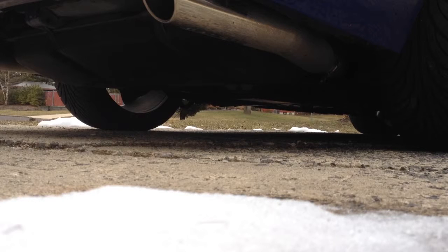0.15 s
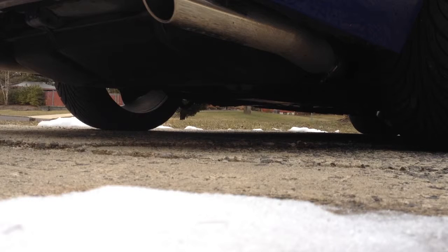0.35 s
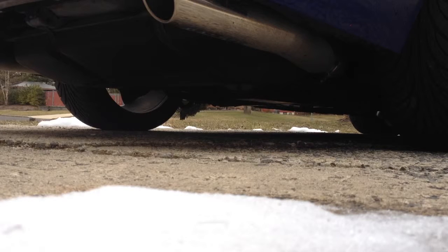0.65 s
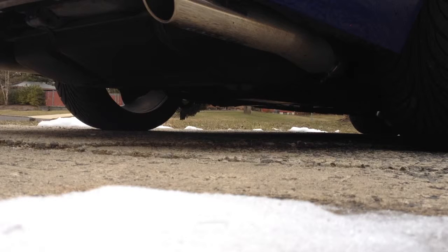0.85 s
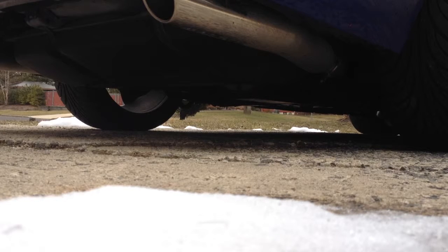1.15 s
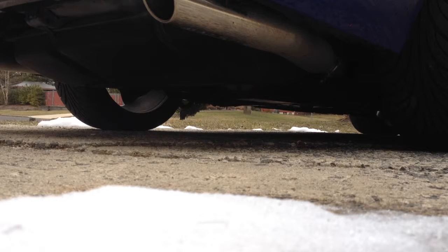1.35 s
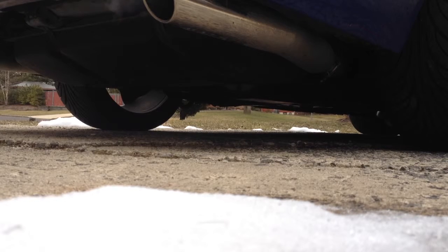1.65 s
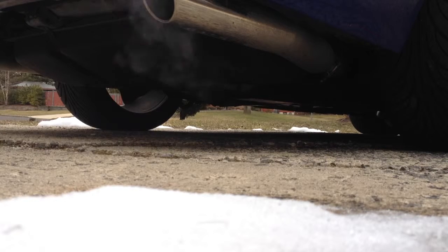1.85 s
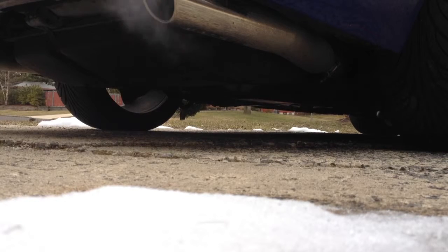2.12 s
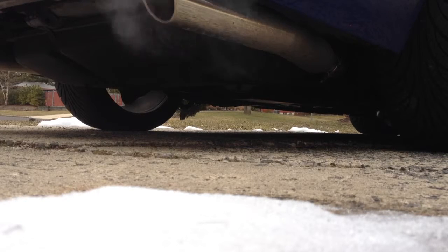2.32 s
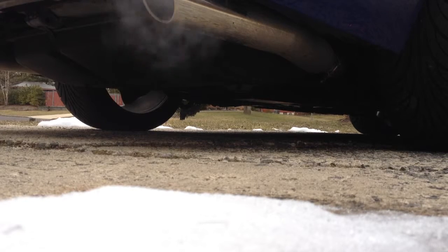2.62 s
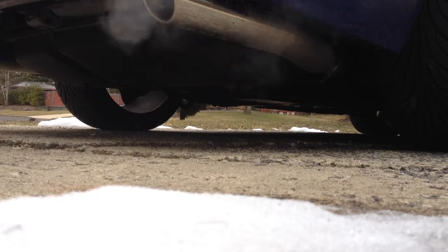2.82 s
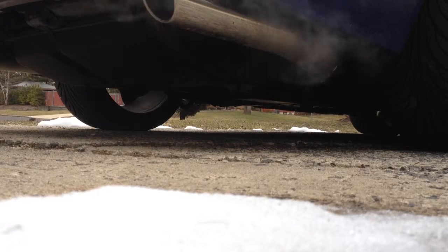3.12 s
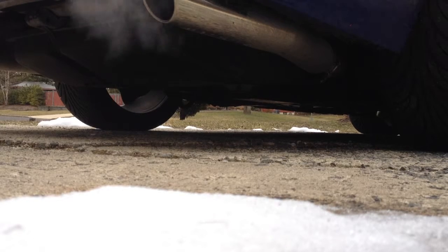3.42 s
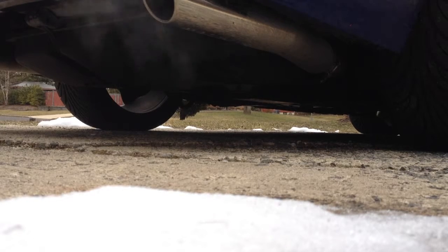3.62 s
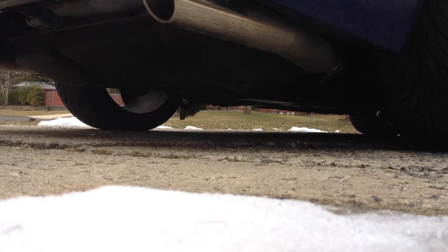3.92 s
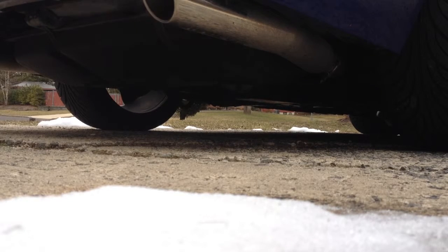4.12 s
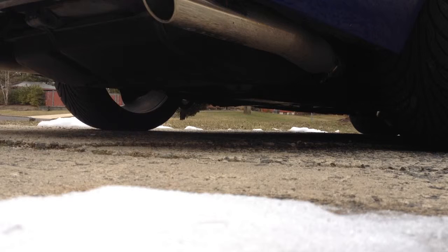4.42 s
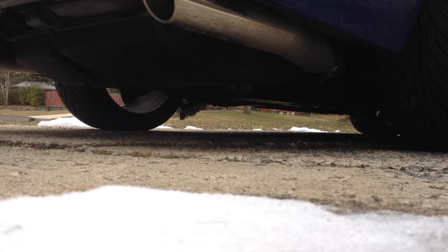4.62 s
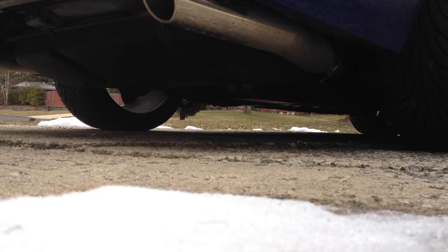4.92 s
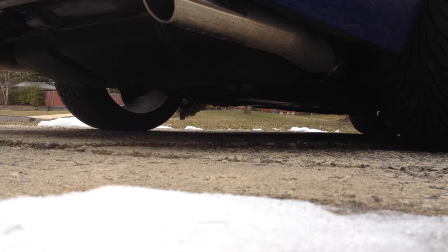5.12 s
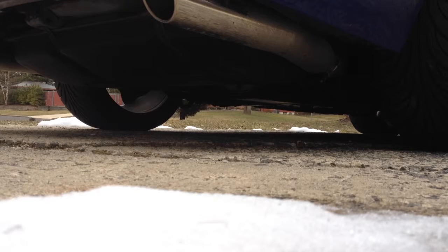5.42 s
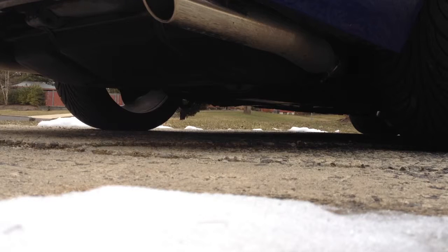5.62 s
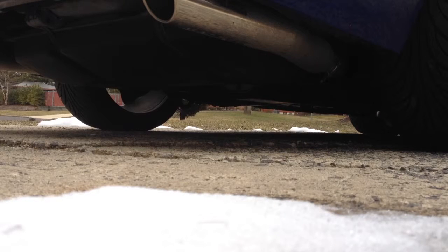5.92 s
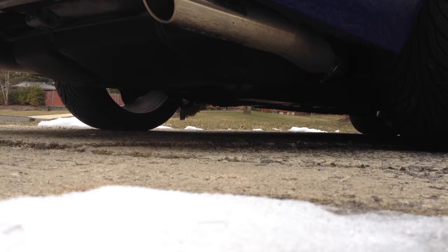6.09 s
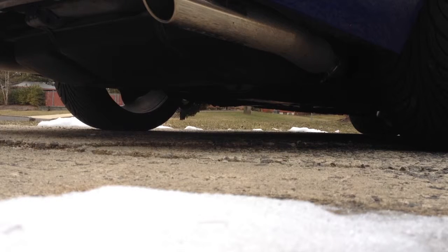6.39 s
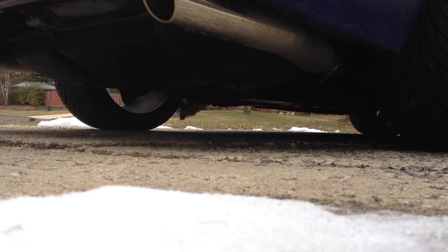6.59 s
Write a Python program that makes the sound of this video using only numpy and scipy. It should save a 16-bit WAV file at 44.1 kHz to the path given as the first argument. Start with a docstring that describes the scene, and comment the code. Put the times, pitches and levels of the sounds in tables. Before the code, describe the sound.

A V8 car engine idles with a deep loping exhaust, then shuts off, chuffing to a stop with brief belt chirps.

```python
"""A driveway, the microphone on the ground close beside the tailpipe of an idling V8. Eight unequal
cylinders ring the exhaust in a loping pattern over gas hiss and clatter. Near 4 s the load comes off and
the idle lifts. Just before 5 s the ignition is cut: the engine chuffs to a stop, valves ticking, and the
slipping belt chirps. Last, the fan coasts down and the car's panels knock over the quiet of the yard."""
import sys
import numpy as np
from scipy import signal
from scipy.fft import rfft, irfft, next_fast_len
from scipy.io import wavfile
from scipy.ndimage import uniform_filter1d

SR = 44100
rng = np.random.default_rng(int(sys.argv[2]) if len(sys.argv) > 2 else 0)


def dump_mix(stems):
    """Bounce the given channels to the path in sys.argv[1] as a 16-bit WAV at rate SR."""
    frames = np.atleast_2d(stems).T  # one column per channel
    limited = np.clip(frames, -1, 1)  # hard clip at full scale
    pcm = np.round(limited * 32767).astype(np.int16)
    wavfile.write(sys.argv[1], SR, pcm)


N = 297665
T = np.arange(N) / SR
BINS = np.maximum(np.fft.rfftfreq(next_fast_len(2 * N, True), 1 / SR), 1)  # Hz
FFT_SIZE = 2 * (len(BINS) - 1)

CYLINDERS = 8
LIFT_AT_S, LIFT_TAKES_S, UNLOAD_S = 3.902, 0.15, 4.07  # the idle lifts, then the lope changes
CUT_S, SURGE_ATTACK_S, STOP_S = 4.89, 0.024, 5.7  # ignition off, unburnt air surges, the crank rests

# Exhaust resonances, two rows to a register: boom, drone, growl, bark, rasp.
# Each row: pitch in Hz, width in Hz, level in dB.
PIPE_MODES = [(126.45, 17.3, 4.5), (140, 18.6, -4.5), (214.3, 43, 0.3), (230.4, 24, 5), (261.8, 15.5, -5.5),
              (335.5, 76, -8), (345.1, 26, -0.7), (396, 96, -9.5), (438, 18.6, -7.5), (447.4, 21.2, -2.5)]


def exhaust(times, cylinder, trim_db=-0.22, path_width_octaves=0.46):
    """Each cylinder's puff has its own delay, strength and pitch, so the note lopes every eight firings."""
    # The cylinders in firing order, under load and running free.
    # Each row: lag in ms, strength in dB, pitch in Hz that its path to the tailpipe favours.
    loaded = [(-1.06, 4.5, 397), (5, 2.5, 169), (-0.65, 4, 372), (-1.5, -3, 203), (7, 8, 113),
              (4.5, 0.24, 295), (4.5, 4, 138), (5.5, 0.2, 127)]
    free = [(-6.5, 9, 590), (-4.5, 2.5, 400), (1.4, 4.5, 500), (-7, 1.3, 193), (2.5, 0, 276),
            (-2.5, 8.39, 140), (-1.5, 7.54, 118.0), (-1.71, 5, 156)]
    under_load = (times < UNLOAD_S)[:, None]
    lag_ms, db, hz = np.where(under_load, np.array(loaded)[cylinder], np.array(free)[cylinder]).T
    # a warm idle repeats closely
    stray_ms, stray_db = (rng.standard_normal((len(times), 2)) * [0.09, 0.9]).T
    arrivals = times + (lag_ms + stray_ms) / 1000
    octaves_off = np.log2(np.array(PIPE_MODES)[::2, 0] / hz[:, None])
    path_db = -20 * np.log10(1 + (octaves_off / path_width_octaves) ** 2)
    return pipe(arrivals, (db + trim_db + stray_db)[:, None] + path_db)


def pipe(times, register_db):
    """Millisecond puffs of pressure ring the exhaust; neighbouring modes swing in opposite senses."""
    out = 0
    for register, db in enumerate(register_db.T):
        pair = PIPE_MODES[2 * register:2 * register + 2]
        lower, upper = (undb(mode_db) * resonance(hz, width) for hz, width, mode_db in pair)
        out += filtered(pulses(times, undb(db) * SR / 1000), lower - upper)
    return out


def overtones(times, cylinder, rise_s=0.011):
    """The thin tailpipe sings hoarsely as certain cylinders' puffs blow through it."""
    # Each row: place in the firing order, pitch in Hz, width in Hz, level in dB.
    hoarse_notes = [(0, 410, 125, -27.5), (0, 558, 80, -45), (0, 722, 110, -43), (4, 807, 90, -43),
                    (6, 882, 80, -46), (6, 978, 90, -38.5), (6, 1530, 200, -44)]
    age = T[:SR // 10] / rise_s
    puff = age * np.exp(1 - age)
    out = 0
    for slot, hz, width, db in hoarse_notes:
        puffs = repeated(puff, times, cylinder == slot)
        out += undb(db) * puffs * noise(resonance(hz, width))
    return out


def throb(crank, firing_db=-47, burble_db=-42):
    """The firing rate itself hums deep down, under a soft irregular burble."""
    # Each row: frequency in Hz, level in dB.
    burble_spectrum = [(25, -8.5), (50, -13.5), (85, -8.5), (130, -4), (260, -4.5), (480, 7), (600, 2.5)]
    running = np.interp(T, [5.0, 5.2], [1, 0])
    hum = undb(firing_db) * np.sin(2 * np.pi * crank)
    return running * (hum + undb(burble_db) * noise(colour(burble_spectrum)))


def gas(crank, times, cylinder, clatter_db=-4, spit_db=3, spit_decay_firings=0.24, unlit_share=0.6):
    """Gas rushes out under the engine's clatter; its hiss spits once a puff, less sharply after the cut."""
    # The low rush and the high hiss. Each row: frequency in Hz, level in dB.
    rush_spectrum = [(380, -27), (650, -9), (711, 3.5), (764, -0.5), (921, -5.5), (974, -2), (1100, -4.5),
                     (1200, -10), (1510, -4.5), (1820, -11.5), (2170, -11.5), (2790, -14.5), (3390, -24.5),
                     (4500, -27.5), (5850, -60.5), (9900, -120)]
    hiss_spectrum = [(2060, -30.5), (3500, -8), (3830, -14.5), (4200, -0.5), (4630, -7.5), (5110, 3),
                     (6020, -0.5), (6880, -7.5), (8510, -10), (11300, -22), (14000, -16), (15000, -21.5)]
    turbulence = rng.standard_normal(N) * undb(1.2 * walk(40))
    rush = unit(filtered(turbulence + undb(clatter_db) * clatter(times, cylinder), colour(rush_spectrum)))
    rush *= flow(idle_db=-36.5, lift_db=-0.5, surge_db=6.5, power=1.22)
    burning = 1 - (1 - unlit_share) * ramp(CUT_S, SURGE_ATTACK_S)
    since_puff = (crank + 0.13) % 1
    spit = burning * np.exp(-since_puff / spit_decay_firings) * undb(spit_db + 2 * walk(55))
    hiss = unit(filtered(rng.standard_normal(N) * (1 + spit), colour(hiss_spectrum)))
    hiss *= flow(idle_db=-58, lift_db=-1.5, surge_db=16, power=1.9)
    return rush + hiss * undb(2.5 * swell(0.69, 0.45))  # the hiss swells briefly early on


def flow(idle_db, lift_db, surge_db, power):
    """Gain of moving gas: steady at idle, shifted off load, surging at the cut, falling with the speed."""
    lift = lift_db * ramp(LIFT_AT_S, 2 * LIFT_TAKES_S)
    surge = surge_db * ramp(CUT_S, SURGE_ATTACK_S)
    return undb(idle_db + lift + surge) * spin() ** power


def clatter(times, cylinder, decay_s=0.014):
    """Every cylinder makes its own short rattle, the same on each turn."""
    t = T[:SR // 20]
    rattles = rng.standard_normal((CYLINDERS, len(t))) * np.exp(-t / decay_s)
    return unit(sum(repeated(rattle, times, cylinder == c) for c, rattle in enumerate(rattles)))


def firing_rate(idle_hz=54.57, hunt_hz=0.611, hunt_peak_s=2.384, hunt_period_s=3.412, lift_hz=2.84):
    """Firings a second: a slowly hunting idle, a small lift as the load comes off, then the run-down."""
    hunt = hunt_hz * np.cos(2 * np.pi * (T - hunt_peak_s) / hunt_period_s)
    return (idle_hz + hunt + lift_hz * ramp(LIFT_AT_S, LIFT_TAKES_S)) * spin()


def spin():
    """Share of its speed that the crank keeps against friction: 1 until the cut, 0 at rest."""
    return (1 - ramp(CUT_S, STOP_S - CUT_S)) ** 0.85


def run_down(boom_hz=126, drone_hz=218, rise_s=0.021, release_s=0.034, churn_db=-19):
    """Unlit pistons pump chuffs that swell the pipe's boom and drone; the air churns less as they slow."""
    # The strongest last strokes. Each row: peak time in seconds, boom in dB, drone in dB.
    strokes = [(4.929, -18, -17), (4.988, -19, -14), (5.078, -15, -17.5), (5.146, -10, -18),
               (5.264, -16.5, -29), (5.32, -21, -20), (5.403, -23, -36), (5.483, -20.5, -28.5),
               (5.552, -29.5, -37.5), (5.62, -39, -45)]
    # Each row: frequency in Hz, level in dB.
    churn_spectrum = [(35, -28.5), (55, -17), (85, -30), (115, 3), (170, 1), (225, -1), (275, -7), (345, 3),
                      (450, -2), (540, -10), (700, -36.5)]
    boom, drone = tone(boom_hz, 3.89, 35), tone(drone_hz, 11.5, 35)
    chuffs = 0
    for s, boom_db, drone_db in strokes:
        envelope = swell(s, np.where(T < s, rise_s, release_s))
        chuffs += envelope * (undb(boom_db) * boom + undb(drone_db) * drone)
    churn_gain = undb(churn_db) * ramp(CUT_S, SURGE_ATTACK_S) * spin() ** 1.8
    return chuffs + churn_gain * noise(colour(churn_spectrum))


def valves(times, tick_db=-46, decay_s=0.0065, scatter_db=3):
    """With the firing gone, the valve gear is heard ticking, slower and softer as the crank stops."""
    # Each row: ring pitch in Hz, width in Hz, level in dB.
    gear_modes = [(2930, 640, 3.5), (5270, 500, -6), (6000, 300, -6), (8500, 820, -9.5)]
    sizes = undb(scatter_db * rng.standard_normal(len(times)))
    ticks = repeated(np.exp(-T[:SR // 10] / decay_s), times, sizes)
    ring = noise(sum(undb(db) * resonance(hz, width) for hz, width, db in gear_modes))
    return undb(tick_db) * ticks * spin() ** 0.5 * ring


def belt(sag_share=0.038, echo_db=-27, echo_s=0.077):
    """The belt slips on a pulley as the crank slows: each squeak sags onto its note; the yard echoes it."""
    # Each row: peak time and half length in seconds, pitch in Hz, level in dB, relative scrape in dB.
    squeaks = [(5.082, 0.012, 6000, -42, 0), (5.135, 0.011, 5850, -54, -11), (5.3, 0.0078, 5830, -47, -9),
               (5.617, 0.011, 4170, -48.5, 6), (5.693, 0.0091, 4190, -29, -23)]
    # Each row: multiple of the squeak's pitch, waver in Hz, level in dB.
    partials = [(.75, 250, -22), (1, 81, -1.5), (1.13, 200, -25), (1.239, 60.4, -22.5), (1.77, 151, -34),
                (2, 200, -33), (3, 200, -31)]
    # The dry scrape. Each row: frequency in Hz, level in dB.
    scrape_spectrum = [(1500, 8), (3000, -3), (4250, -10), (4900, -11), (5600, -9), (7000, -20),
                       (11000, -23), (14500, -22)]
    out = 0
    for s, half_s, hz, db, scrape_db in squeaks:
        pitch = hz * (1 + sag_share * np.clip((s - T) / half_s - 0.3, 0, 1))
        squeal = sum(undb(level) * tone(pitch * multiple, waver, 700) for multiple, waver, level in partials)
        scrape = undb(scrape_db) * noise(colour(scrape_spectrum))
        chirp = swell(s, half_s) + 0.32 * swell(s + 2 * half_s, 1.06 * half_s)
        echo = undb(echo_db) * (T > s) * np.exp(-abs(T - s) / echo_s)
        out += undb(db) * (chirp + echo) * (squeal + scrape)
    return out


def knocks(attack_s=0.0025, ring_width_share=0.073):
    """Short rattling blows on the car's panels, each with a rough ring of its own."""
    # Each row: start in seconds, level in dB, decay in seconds, tilt in dB per octave,
    # ring pitch in Hz, relative ring level in dB.
    blows = [(1.38, -30.5, 0.025, 2.5, 2430, -6.5), (5.196, -30, 0.0066, -3, 1480, 6.5),
             (5.198, -41.5, 0.051, -10, 556, 13.5), (5.798, -42.5, 0.033, -2.5, 517.9, -2.5),
             (5.985, -52, .012, 3, 3000, -9), (6.601, -37.5, .019, -3, 269, 0.5),
             (6.625, -42.5, 0.02, -4.5, 700, -6)]
    # Each row: frequency in Hz, level in dB.
    panel_spectrum = [(150, -14), (260, -1.5), (450, -7.5), (750, -7), (1500, -10.5), (3000, -18.5),
                      (5500, -43), (9000, -57), (15000, -63)]
    out = 0
    for s, db, decay_s, tilt_db, ring_hz, ring_db in blows:
        envelope = ramp(s, attack_s) * np.exp(-abs(T - s) / decay_s)
        rattle = noise(colour(panel_spectrum) * undb(tilt_db * np.log2(BINS / 1000)))
        ring = undb(ring_db) * noise(resonance(ring_hz, ring_width_share * ring_hz))
        out += undb(db) * envelope * (rattle + ring)
    return out


def fan(at_s=5.8, blade_hz=399, slows_per_s=0.455, body_hz=278, body_width_hz=19, body_db=14):
    """The radiator fan coasts: its wind fades and its note sinks, swelling through a body resonance."""
    # Each row: frequency in Hz, level in dB.
    wind_spectrum = [(53, -35), (90, -14), (142, -2), (195, -18), (241, -2), (325, -25), (367, 0),
                     (415, -9), (495, -18), (679, -3.5), (915, -17.5), (1500, -13.5), (6000, -46),
                     (7800, -70), (13200, -120)]
    age = T - at_s
    hz = blade_hz * np.exp(-slows_per_s * age)
    boost = 1 + undb(body_db) / (1 + ((hz - body_hz) / body_width_hz) ** 2)
    note = undb(-55 - 9 * age + 2 * walk(20)) * boost * tone(hz, 3.23, 40)
    wind = undb(-47 - 16.5 * age) * noise(colour(wind_spectrum))
    return note * ramp(5.65, 0.17) + wind * ramp(5.45, 0.15)


def yard(level_db=-52.5):
    """A faint low murmur round the driveway, drifting slightly in level."""
    # Each row: frequency in Hz, level in dB.
    murmur_spectrum = [(41, -43), (70, -25), (123, -1), (295, -1.5), (494, -16.5), (647, -13), (906, -16),
                       (991, -12.5), (1240, -24), (1420, -17.5), (1820, -19.5), (4670, -39), (10000, -43),
                       (15000, -43.5)]
    return noise(colour(murmur_spectrum)) * undb(level_db + walk(2.6))


def undb(db):
    """Decibels to gain."""
    return 10 ** (np.asarray(db) / 20)


def unit(x):
    """Scale to rms 1."""
    return x / np.std(x)


def filtered(x, response):
    """Pass a sound through a frequency response."""
    return irfft(rfft(x, FFT_SIZE) * response, FFT_SIZE)[:N]


def colour(points):
    """Response through (Hz, dB) points, falling steeply beyond both ends."""
    hz, db = np.transpose(points)
    skirts = np.minimum(1, np.minimum(BINS / hz[0], hz[-1] / BINS)) ** 4
    return undb(np.interp(np.log(BINS), np.log(hz), db)) * skirts


def resonance(hz, width):
    """A band-pass applied twice: it swells, then rings away."""
    return 1 / (1 + 1j * (BINS ** 2 - hz ** 2) / (BINS * width)) ** 2


def noise(response):
    """Noise of rms 1 with the given response."""
    return unit(filtered(rng.standard_normal(N), response))


def walk(rate):
    """Random wandering, `rate` steps a second, spread near 1."""
    hold = int(SR / rate)
    steps = np.repeat(rng.standard_normal(N // hold + 1), hold)
    return 1.2 * uniform_filter1d(steps, hold)[:N]


def pulses(times, sizes):
    """A click of each size at each time; clicks before zero wrap round, so their ring carries in."""
    return np.bincount((times * SR).astype(int) % FFT_SIZE, sizes, FFT_SIZE)


def repeated(shape, times, sizes):
    """A scaled copy of the shape at each time."""
    return signal.fftconvolve(pulses(times, sizes)[:N], shape)[:N]


def tone(hz, waver_hz, rate):
    """A sine whose pitch wanders."""
    return np.sin(2 * np.pi * np.cumsum(hz + waver_hz * walk(rate)) / SR)


def swell(peak_s, half_s):
    """A rounded rise and fall."""
    return np.exp(-((T - peak_s) / half_s) ** 2)


def ramp(start_s, length_s):
    """Rises from 0 to 1."""
    return np.clip((T - start_s) / length_s, 0, 1)


def scene():
    """Car and yard at one microphone; the crank angle, counted in firings, times the puffs and ticks."""
    rate = firing_rate()
    crank = 1.195 + np.cumsum(rate) / SR
    firing = np.arange(-4, int(crank[-1]))  # the engine is already running
    times = np.interp(firing, crank, T) + np.minimum(firing - crank[0], 0) / rate[0]
    cylinder = firing % CYLINDERS
    lit = times < CUT_S
    tailpipe = exhaust(times[lit], cylinder[lit]) + overtones(times[lit], cylinder[lit])
    engine = tailpipe + throb(crank) + gas(crank, times, cylinder)
    return (engine + yard() + run_down() + valves(times[~lit]) + belt() + fan() + knocks())[None]


def record(dry):
    """The recorder cuts the top steeply above 15350 Hz."""
    return signal.sosfilt(signal.ellip(10, 0.1, 80, 15350, fs=SR, output="sos"), dry)


dry = scene()
out = record(dry)
dump_mix(out)
```